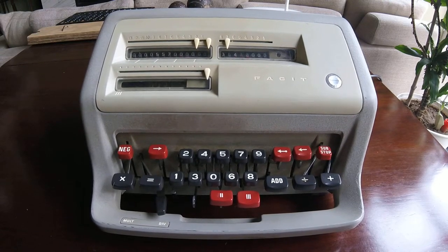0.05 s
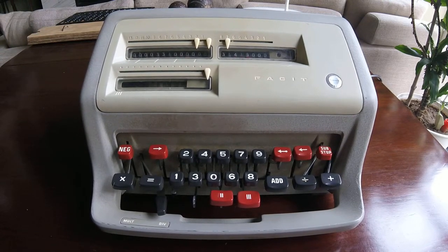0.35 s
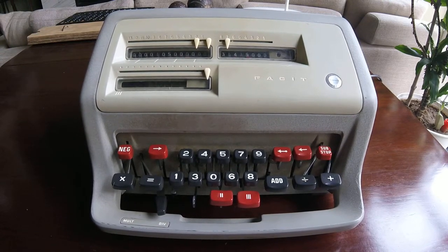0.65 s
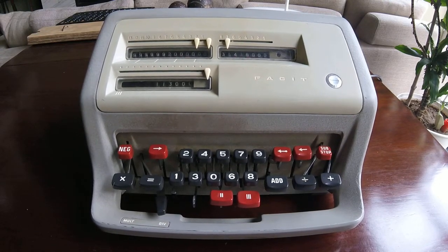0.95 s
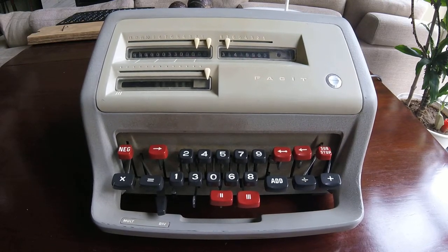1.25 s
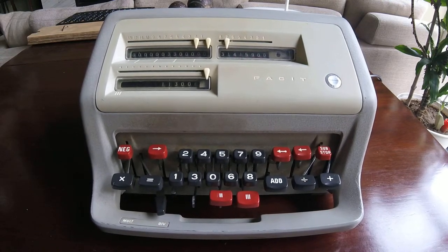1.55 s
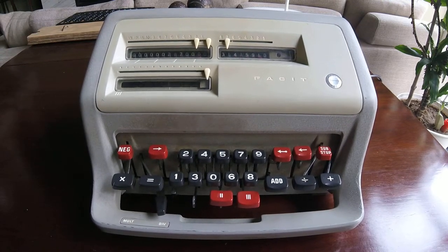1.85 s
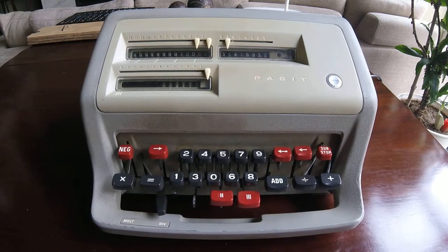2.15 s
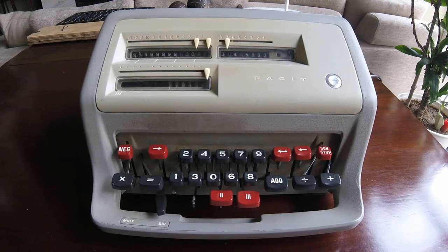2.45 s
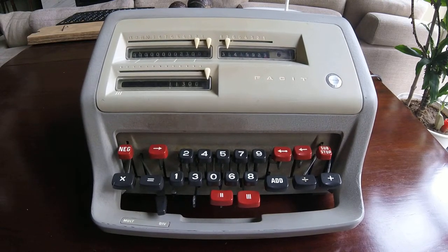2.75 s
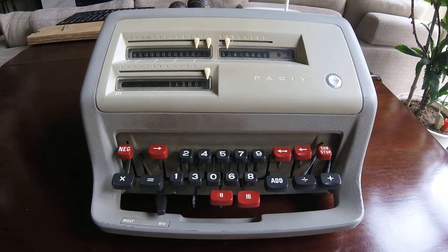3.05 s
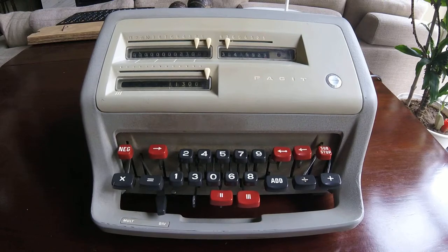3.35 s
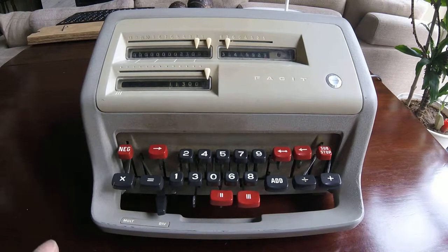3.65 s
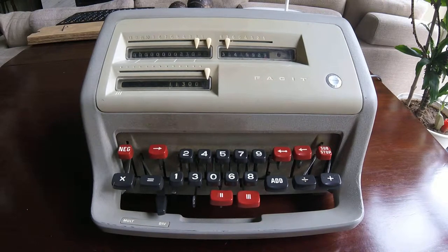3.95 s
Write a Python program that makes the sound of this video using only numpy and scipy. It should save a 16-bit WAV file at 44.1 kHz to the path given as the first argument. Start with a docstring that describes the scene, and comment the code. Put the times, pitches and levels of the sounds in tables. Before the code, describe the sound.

Rapid metal clacking and whirring from a mechanical calculator, which then coasts to a stop.

```python
"""A motor-driven mechanical calculator works through a sum, close to the microphone on a wooden table.
Its carriage steps along in runs, six steps a second; levers and latches strike steel inside the metal
case, and the pins of the counting drum grind round in four bursts. Gear teeth whirr underneath until
the motor coasts down, with a few faint last clacks. Behind it lies a quiet furnished room: air, a low
hum, soft bumps on the table and a hiss that swells at the very end."""
import sys
import numpy as np
from scipy import signal
from scipy.fft import rfft, irfft, next_fast_len
from scipy.io import wavfile
from scipy.ndimage import map_coordinates

SR = 44100
rng = np.random.default_rng(int(sys.argv[2]) if len(sys.argv) > 2 else 0)


def generate_wav(sig):
    """Save sig (samples, or channels by samples) to the path in sys.argv[1] as 16-bit PCM at SR."""
    pcm = np.round(np.clip(np.atleast_2d(sig).T, -1, 1) * 32767).astype(np.int16)
    wavfile.write(sys.argv[1], SR, pcm)


N = 176400
CLACK_T60_S, CLACK_RISE_S = 0.032, 0.002
FRAME_DETUNE = 0.012  # relative pitch scatter from blow to blow

# steel on steel inside the case, heard from close by (f/Hz, gain/dB)
STEEL_COLOUR = [(60, -48), (300, -10), (600, -19), (900, -13.5), (1200, -11.5), (1700, -8), (2300, -3),
                (3300, -2.5), (4300, 1), (5200, -3), (5900, 3), (6550, 5.5), (7100, -8), (8000, -9),
                (8800, -16), (11800, -16.5), (13300, -50), (14800, -49)]
# resonances of the metal case (f/Hz, width/Hz, gain/dB)
CASE_MODES = [(603, 23, 2.5), (763, 44, -6.5), (1012, 18, 4.5), (1475, 22, 0.5), (2200, 25, 1.5),
              (2937, 25, -1.5), (6374, 117, -2.5)]
# brief high treble fizz on some clacks (f/Hz, gain/dB)
FIZZ_COLOUR = [(3000, -36.5), (8000, -16.5), (13400, 4.5), (14800, -17.5)]
# ring of the carriage (f/Hz, gain/dB, t60/s)
CARRIAGE_MODES = [(638, -13.5, 0.077), (825, -10.5, 0.071)]
# carriage landings (t/s, level/dB, fizz gain/dB)
CARRIAGE_STEPS = [(.001, -18.5, -12), (0.165, -17.5, -14), (0.328, -18, -10), (0.492, -16.5, -15),
                  (0.656, -17.5, -21.5), (0.82, -17, -13.5), (1.277, -17.5, -38.5), (1.815, -16, -27),
                  (1.98, -17, -44), (2.143, -16.5, -35), (2.600, -18.5, -17.5)]
def carriage():
    """Each step: the pawl engages, then the carriage lands with a thump and rings."""
    pawl_lead_s, thump_lead_s = 0.0074, 0.00385  # both start ahead of the landing
    steel, treble, body = np.zeros((3, N))
    for s, db, fizz_db in CARRIAGE_STEPS:
        add(steel, s - pawl_lead_s, amp(db + 3.5) * crack(t60=0.058, rise=0.0085))
        add(steel, s, amp(db) * crack(CLACK_T60_S))
        for onset in (s - pawl_lead_s / 2, s):
            add(treble, onset, amp(fizz_db) * fizz())
        thump = amp(db - 5) * ring(detuned(268, FRAME_DETUNE), t60=0.11, rise=0.0078)
        ringing = sum(amp(db + gain) * ring(detuned(hz, 0.016), t60, rise=0.015)
                      for hz, gain, t60 in CARRIAGE_MODES)
        add(body, s - thump_lead_s, thump + ringing)
    return coloured(steel, STEEL_COLOUR, CASE_MODES) + coloured(treble, FIZZ_COLOUR) + body


# lever blows inside the case (t/s, clack level/dB, thud level/dB, knock level/dB)
LEVER_BLOWS = [(.034, -23.5, -28, -34), (0.241, -23, -41, -46), (0.526, -23.5, -41, -41),
               (0.859, -20, -27, -50), (.881, -10, -30, -25.5), (0.906, -12.5, -19, -43),
               (0.923, -16.5, -31, -29), (0.995, -16, -17.5, -30.5), (1.002, -18.5, -24, -24.5),
               (1.024, -16.5, -26, -32), (1.043, -14.5, -35, -31), (1.093, -17, -29, -30),
               (1.205, -13.5, -29, -30), (1.223, -22, -26.5, -46), (1.291, -22.5, -30, -43),
               (1.347, -16.5, -56, -54), (1.36, -16, -21, -46), (1.365, -12.5, -28.5, -31),
               (1.392, -13.5, -33, -22.5), (1.437, -21, -22.5, -39), (1.462, -20, -18, -29),
               (1.497, -15.5, -19, -28), (1.525, -14.5, -24.5, -30), (1.543, -15, -25, -27),
               (1.592, -19.5, -29, -34), (1.633, -21, -33.5, -55), (1.728, -22, -19, -27.5),
               (1.773, -24.5, -32, -46), (1.844, -25.5, -29, -40), (2.206, -11.5, -36, -39),
               (2.212, -17, -40, -43), (2.231, -19, -19.5, -36), (2.281, -13.5, -20, -28),
               (2.303, -9.5, -21.5, -36), (2.320, -37, -21.5, -28), (2.42, -20.5, -27, -34),
               (2.473, -25.5, -42, -49), (2.553, -28, -25.5, -30), (2.69, -11.5, -26, -28),
               (2.716, -14, -39, -43), (2.734, -22, -22.5, -38), (3.308, -43, -60, -55),
               (3.418, -39, -45, -47), (3.559, -47, -62, -63)]
def levers():
    """Levers slide, strike their stops, jolt the frame, knock the panels and ring."""
    steel, body = np.zeros((2, N))
    for s, clack_db, thud_db, knock_db in LEVER_BLOWS:
        slide = scrape()
        add(steel, s - len(slide) / SR, amp(clack_db) * slide)
        add(steel, s, amp(clack_db) * crack(CLACK_T60_S))
        add(body, s, amp(thud_db) * thud() + amp(knock_db) * knock() + amp(clack_db) * clang())
    return coloured(steel, STEEL_COLOUR, CASE_MODES) + body


# latches shutting (t/s, clack level/dB, fizz gain/dB, thud level/dB, knock level/dB)
LATCH_BLOWS = [(1.201, -22.5, -25, -42, -32), (1.7104, -14, -22, -33, -39), (2.368, -15.5, -21, -28, -31.5),
               (2.530, -15, -17, -28, -30.5), (2.858, -16.5, -34.5, -28.5, -31),
               (3.395, -33, -46, -45, -41.5)]
def latches():
    """Sprung latches shut without sliding: a sudden crack, heard with a brief treble fizz."""
    steel, treble, body = np.zeros((3, N))
    for s, clack_db, fizz_db, thud_db, knock_db in LATCH_BLOWS:
        add(steel, s, amp(clack_db) * crack(t60=0.033, rise=0.0016))
        add(treble, s, amp(fizz_db) * fizz())
        add(body, s, amp(thud_db) * thud() + amp(knock_db) * knock() + amp(clack_db) * clang())
    return coloured(steel, STEEL_COLOUR, CASE_MODES) + coloured(treble, FIZZ_COLOUR) + body


def crack(t60, rise=CLACK_RISE_S, colour_db=1.5, colour_width_hz=446):
    """A dying burst of noise with a colour of its own, as when many tiny steel parts ring."""
    spectrum = rfft(rng.standard_normal(SR // 3))
    hz = np.fft.rfftfreq(SR // 3, 1 / SR)
    colour = map_coordinates(rng.standard_normal(256), [hz / colour_width_hz], mode="wrap")
    return decay(t60, rise) * unit(irfft(spectrum * amp(colour_db * colour), SR // 3))


def fizz():
    """A very short burst of noise for the treble fizz on some clacks."""
    return amp(-20.5) * crack(t60=0.012, rise=0.0016)


def scrape(swell_s=0.0018):
    """A quick swell of sliding contact, ending at the blow."""
    t = np.arange(SR // 50) / SR
    return amp(-10) * np.exp(-t[::-1] / swell_s) * rng.standard_normal(len(t))


# modes of the frame and the table top under it (f/Hz, gain/dB, t60/s)
FRAME_MODES = [(61, -13.5, 0.11), (108.6, -9, 0.22), (127, -7, 0.15), (214.4, -7, 0.13), (251.8, -7.5, .16),
               (282, -5.5, 0.117), (369, -9, 0.084), (578, -20.5, 0.11), (1456, -12, 0.088)]
def thud():
    """The frame and table answer a blow with their low modes."""
    return sum(amp(db + rng.normal()) * ring(detuned(hz, FRAME_DETUNE), t60, rise=0.0037)
               for hz, db, t60 in FRAME_MODES)


# hollow modes of the case panels (f/Hz, gain/dB, t60/s)
PANEL_MODES = [(433, -8.5, 0.037), (596, -9, 0.051), (808, -4.5, .055), (1008, -6, 0.11)]
def knock():
    """The panels answer a blow, differently for every spot that is struck."""
    return sum(amp(db + 2 * rng.normal()) * rng.choice([-1, 1])
               * ring(detuned(hz, 0.05), t60, rise=0.0025) for hz, db, t60 in PANEL_MODES)


# modes of the steel levers (f/Hz, gain/dB, t60/s)
LEVER_MODES = [(2934, -14.5, 0.059), (4200, -27, 0.039), (6070, -8, 0.022), (6445, -19, 0.029)]
def clang():
    """A struck lever rings in its modes, a little differently each time."""
    return sum(amp(db + 2 * rng.normal()) * ring(detuned(hz, 0.009), t60, rise=0.00096)
               for hz, db, t60 in LEVER_MODES)


# the frame shaking under the drum (f/Hz, gain/dB)
SHAKE_COLOUR = [(20, -38), (50, -15.5), (122, 1), (165, -8.5), (215, -1), (290, 0.5), (400, -16),
                (800, -14), (4000, -82.5)]
# turns of the counting drum (t/s, length/s, level/dB, sag/(dB/s))
DRUM_TURNS = [(0.855, 0.12, -23.5, 45), (0.982, 0.052, -30.5, 66), (1.354, 0.17, -21.5, 66),
              (2.173, 0.12, -25.5, -7), (2.659, 0.12, -25.5, 27)]
def drum(shake_lag_s=0.023):
    """Pins rattle through the counter wheels and shake the frame a moment later."""
    t = clock()
    pins = drum_effort(t) * chatter(rate=520, jitter=0.2, scatter_db=3, t60=0.02)
    shake = drum_effort(t - shake_lag_s) * rng.standard_normal(N)
    rattle = shifting(coloured(pins, STEEL_COLOUR, CASE_MODES))
    return rattle + amp(-8) * coloured(shake, SHAKE_COLOUR, CASE_MODES)


def drum_effort(t, rise_s=0.009, fall_s=0.005):
    """Each turn takes up load quickly, sags or swells a little, and lets go."""
    effort = np.zeros(N)
    for s, length, db, sag in DRUM_TURNS:
        take_up = np.clip((t - s) / rise_s, 0, 1)
        load = amp(db - sag * np.clip(t - s, 0, length))
        release = np.exp(-np.maximum(t - s - length, 0) / fall_s)
        effort += take_up * load * release
    return effort


def shifting(x, depth_db=2.5, width_hz=170, span_s=0.03):
    """Moving parts keep changing which resonances stand out."""
    hz, t, spectra = signal.stft(x, SR, nperseg=1024)
    grid = np.meshgrid(hz / width_hz, t / span_s, indexing="ij")
    gain = amp(depth_db * map_coordinates(rng.standard_normal((160, 160)), grid, mode="wrap"))
    return signal.istft(spectra * unit(gain), SR, nperseg=1024)[1][:N]


# return spring, between carriage steps (t/s, level/dB)
SPRING_TICKS = [(0.063, -22), (0.226, -24), (.389, -23.5), (0.553, -21), (.716, -24), (1.88, -23.5),
                (2.044, -26.5)]
def spring(ping_hz=11850):
    """Each tick of the return spring carries a short high ping of three close modes."""
    steel, pings = np.zeros((2, N))
    for s, db in SPRING_TICKS:
        add(steel, s, amp(db) * crack(CLACK_T60_S))
        ping = sum(ring(ping_hz + rng.normal(0, 140), t60=0.023, rise=0.0011) for _ in range(3))
        add(pings, s, amp(db - 12) * ping)
    return coloured(steel, STEEL_COLOUR, CASE_MODES) + pings


# running gears, heard from close by (f/Hz, gain/dB)
GEAR_COLOUR = [(60, -9.5), (180, 4.5), (300, 1), (500, -2.5), (900, -1.5), (1200, -4.5), (2400, -1.5),
               (4300, 3), (5100, -4.5), (6500, 2), (7300, -12), (9000, -18), (12000, -25), (14500, -69)]
# mains lines of the motor (f/Hz, level/dB)
MAINS_LINES = [(60, -54), (120, -51)]
# rumble of the driven shafts (f/Hz, gain/dB)
SHAFT_COLOUR = [(25, -17.5), (70, -7), (150, -0.5), (600, -23), (3000, -75.5)]
def motor(off_s=2.75, coast_s=0.93, tooth_hz=121.6, drone_hz=248.5):
    """Gear teeth chatter over whirr, hum and rumble; after switch-off the teeth slow and all fades."""
    t = clock()
    since_off = np.maximum(t - off_s, 0)
    speed = np.sqrt(np.clip(1 - since_off / coast_s, 0, 1))
    teeth = chatter(tooth_hz * speed, jitter=0.228, scatter_db=1.5, t60=0.036)
    whirr = amp(-2) * rng.standard_normal(N)  # smooth rubbing of the shafts
    gear_level = speed * amp(-40.5 - 21 * since_off + wobble(25.24))
    gears = coloured((teeth + whirr) * gear_level, GEAR_COLOUR, CASE_MODES)
    hum = sum(amp(db) * np.sin(2 * np.pi * hz * t + 0.17 * wobble(26)) for hz, db in MAINS_LINES)
    hum *= np.exp(-since_off / 0.043)
    # the frame sings with the running gears, at one rough pitch
    flutter = 1 + 0.22 * (wobble(14) + 1j * wobble(14))
    drone = speed * amp(-45 - 18.5 * since_off) * np.real(flutter * np.exp(2j * np.pi * drone_hz * t))
    rumble = amp(-47 - 33.5 * since_off) * coloured(rng.standard_normal(N), SHAFT_COLOUR)
    return gears + rumble + np.sqrt(2) * (hum + drone)


def room_tail(x):
    """The furnished room sends a short tail back to the microphone."""
    tail = decay(t60=0.24, rise=0.0084) * rng.standard_normal(SR // 3)
    return signal.fftconvolve(x, tail / np.linalg.norm(tail))[:N]


# air of the quiet room (f/Hz, gain/dB)
AIR_COLOUR = [(20, 3), (70, -6.5), (200, -1), (400, -14), (1000, -16.5), (2500, -22), (4500, -37),
              (6600, -19.5), (9000, -28.5), (13000, -36), (14500, -58.5)]
# low hum in the room (f/Hz, level/dB)
ROOM_LINES = [(70, -56.5)]
def room_tone(waver=0.35):
    """Steady air and a wavering hum lie behind the machine."""
    air = amp(-57.5) * coloured(rng.standard_normal(N), AIR_COLOUR)
    hum = sum(amp(db) * (1 + waver * wobble(26)) * np.sin(2 * np.pi * hz * clock() + waver * wobble(13))
              for hz, db in ROOM_LINES)
    return air + np.sqrt(2) * hum


# modes of the wooden table (f/Hz, gain/dB, t60/s)
WOOD_MODES = [(179.5, 1.5, .11), (414, -5.5, 0.063)]
# soft bumps on the table (t/s, level/dB)
TABLE_BUMPS = [(3.607, -45.5), (3.709, -52.5), (3.824, -46), (3.858, -50.5)]
def table_bumps():
    """Each soft bump sets the wood ringing briefly."""
    bump = sum(amp(gain) * ring(hz, t60, rise=0.0042) for hz, gain, t60 in WOOD_MODES)
    track = np.zeros(N)
    for s, db in TABLE_BUMPS:
        add(track, s, amp(db) * bump)
    return track


# faint hiss in the background (f/Hz, gain/dB)
HISS_COLOUR = [(2500, -26), (4200, -3), (6500, -5), (9000, -11), (10000, -38)]
def hiss(start_s=3.92, rise_s=0.099):
    """A soft hiss swells at the very end."""
    swell = np.clip((clock() - start_s) / rise_s, 0, 1)
    return amp(-54.5) * swell * coloured(rng.standard_normal(N), HISS_COLOUR)


def chatter(rate, jitter, scatter_db, t60):
    """A train of uneven contacts, rate a second, each a dying burst of noise; rms 1."""
    timing, strength = rng.standard_normal((4000, 2)).T
    count = np.cumsum(rate * np.ones(N)) / SR
    onsets = np.searchsorted(count, np.arange(len(timing)) + jitter * timing)
    impacts = np.bincount(onsets, amp(scatter_db * strength) ** 2, N + 1)[:N]
    power = np.abs(signal.fftconvolve(impacts, decay(t60, rise=0.000083) ** 2)[:N])
    return unit(np.sqrt(power) * rng.standard_normal(N))


def coloured(x, points, modes=()):
    """Causal filter of unit power: (f/Hz, gain/dB) points with ringing modes on top."""
    size = 2 * next_fast_len(N)
    f = np.fft.rfftfreq(size, 1 / SR)
    hz, db = np.transpose(points)
    cepstrum = irfft(np.log(amp(np.interp(np.log(f + 1), np.log(hz), db))))
    cepstrum[1:size // 2] *= 2  # fold to minimum phase
    cepstrum[size // 2 + 1:] = 0
    resonances = sum(amp(gain) * 1j * f * width / (centre ** 2 - f ** 2 + 1j * f * width)
                     for centre, width, gain in modes)
    response = np.exp(rfft(cepstrum)) * (1 + resonances)
    return irfft(rfft(x, size) * unit(response), size)[:N]


def ring(hz, t60, rise):
    """One damped mode."""
    return decay(t60, rise) * np.sin(2 * np.pi * hz * np.arange(SR // 3) / SR)


def decay(t60, rise):
    """Envelope of one blow; times in seconds."""
    t = np.arange(SR // 3) / SR
    return np.exp(-np.log(1000) * t / t60) * (1 - np.exp(-t / rise))


def wobble(rate):
    """A smooth random curve, rate knots a second."""
    return map_coordinates(rng.standard_normal(2048), [clock() * rate], mode="wrap")


def add(track, s, sound):
    """Mix a sound into the track at time s."""
    part = track[max(round(s * SR), 0):][:len(sound)]
    part += sound[:len(part)]


def detuned(hz, scatter):
    return hz * (1 + scatter * rng.normal())


def amp(db):
    return 10 ** (np.asarray(db) / 20)


def unit(x):
    return x / np.sqrt(np.mean(np.abs(x) ** 2) + 1e-20)


def clock():
    return np.arange(N) / SR


def scene():
    """One microphone close to the calculator, with the room well below the direct sound."""
    machine = carriage() + levers() + latches() + drum() + motor()
    reflections = amp(-17) * room_tail(machine)
    return (machine + reflections + spring() + room_tone() + table_bumps() + hiss())[None]


def record(dry):
    """The recorder keeps nothing above its band limit."""
    top_hz = 14800
    size = next_fast_len(N + SR // 2)
    passband = np.fft.rfftfreq(size, 1 / SR) < top_hz
    return irfft(rfft(dry, size) * passband, size)[..., :N]


dry = scene()
out = record(dry)
generate_wav(out)
```